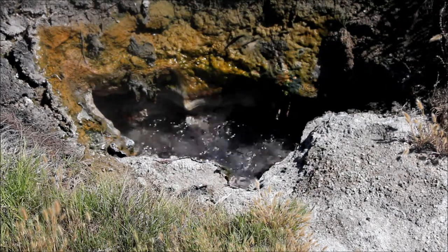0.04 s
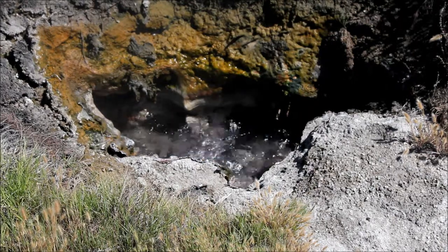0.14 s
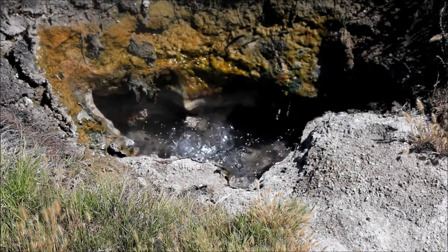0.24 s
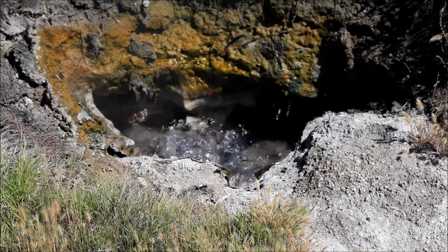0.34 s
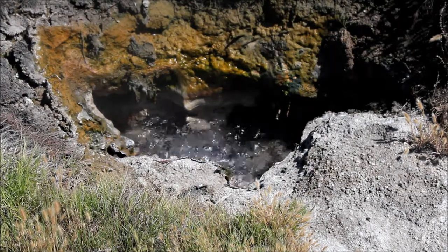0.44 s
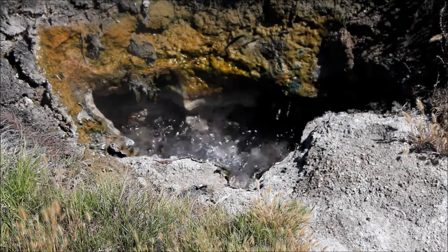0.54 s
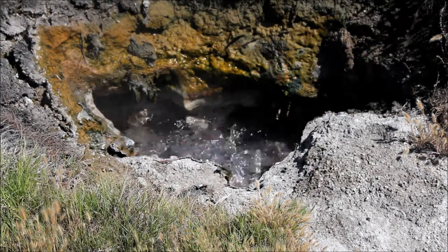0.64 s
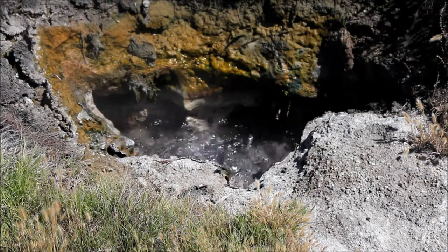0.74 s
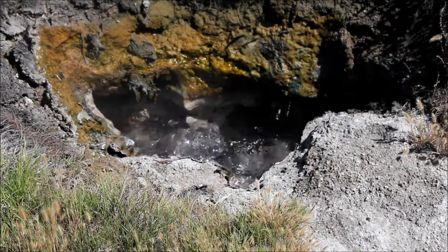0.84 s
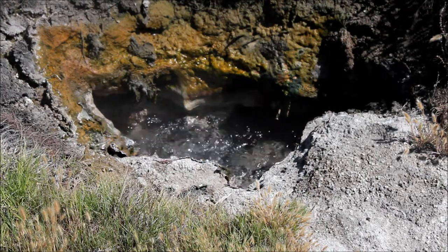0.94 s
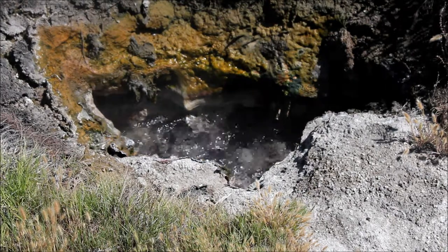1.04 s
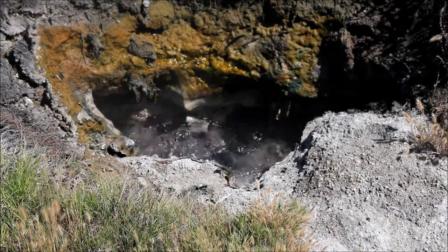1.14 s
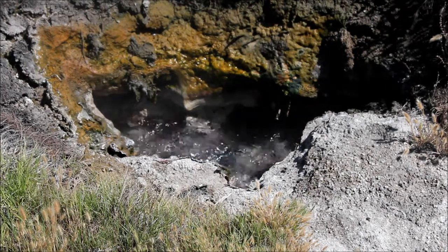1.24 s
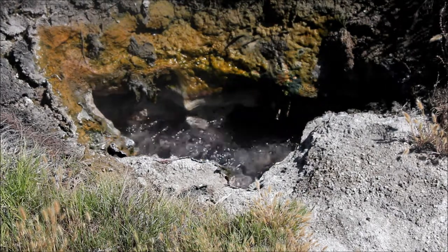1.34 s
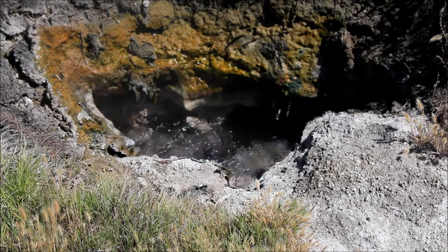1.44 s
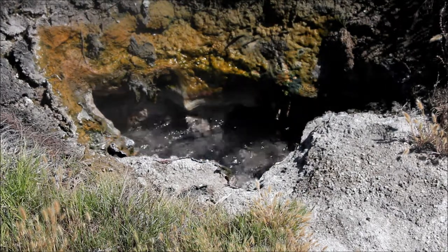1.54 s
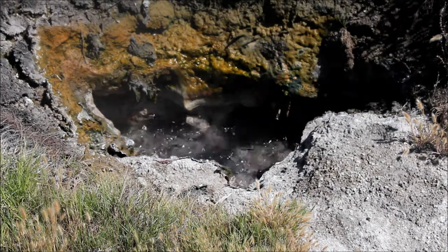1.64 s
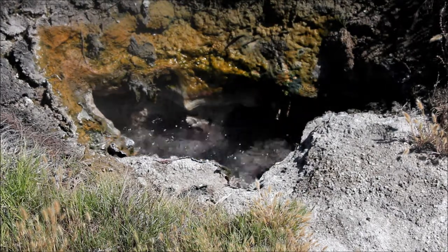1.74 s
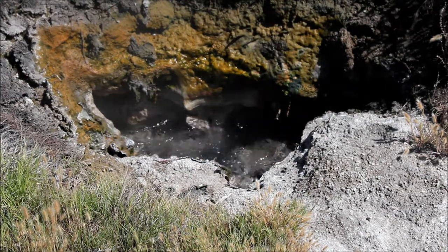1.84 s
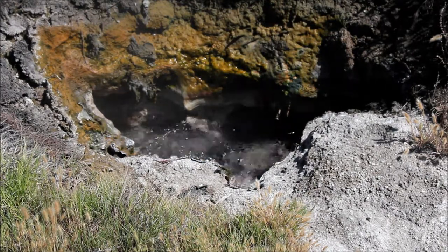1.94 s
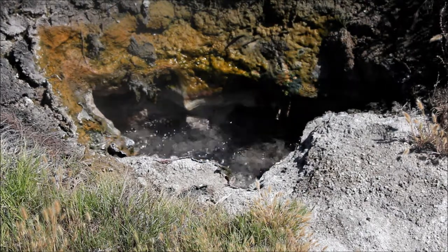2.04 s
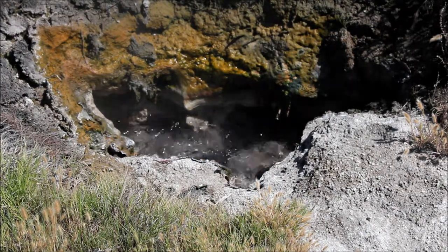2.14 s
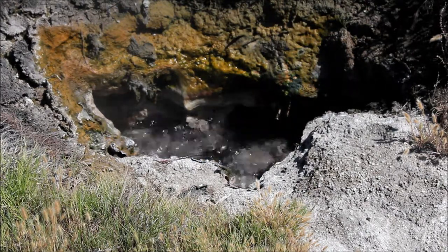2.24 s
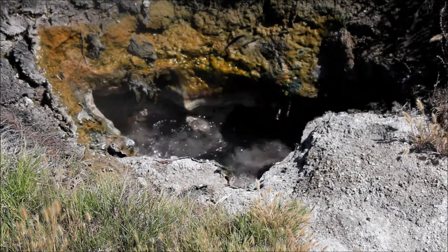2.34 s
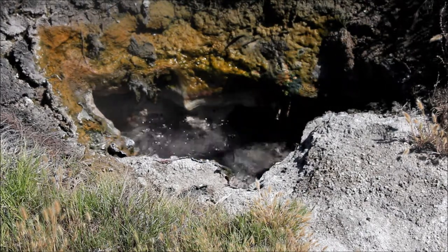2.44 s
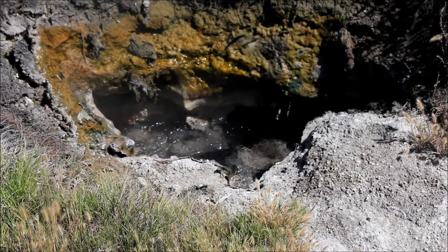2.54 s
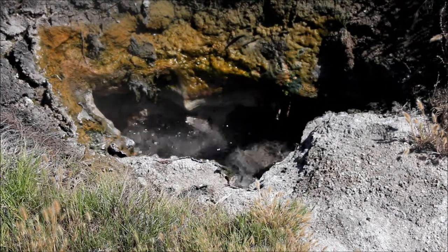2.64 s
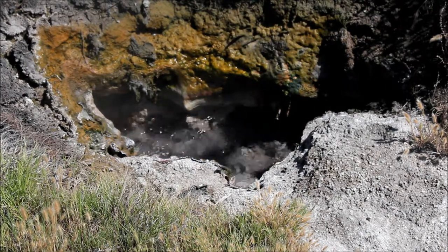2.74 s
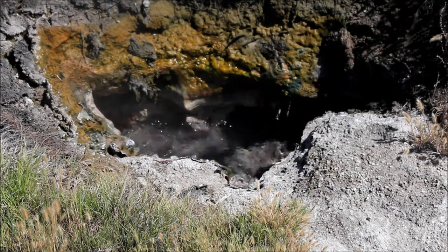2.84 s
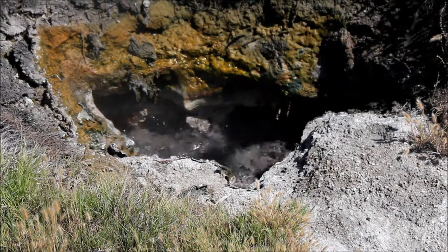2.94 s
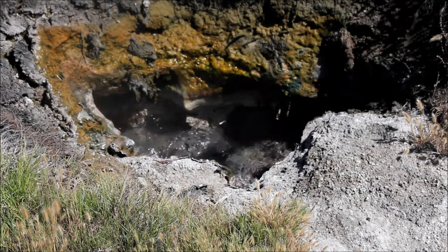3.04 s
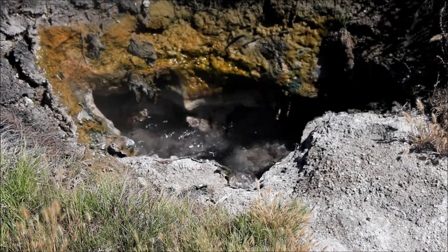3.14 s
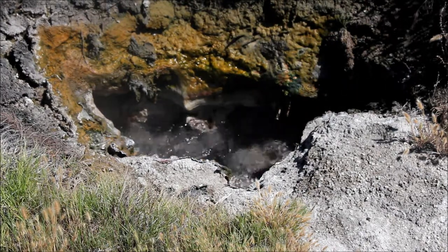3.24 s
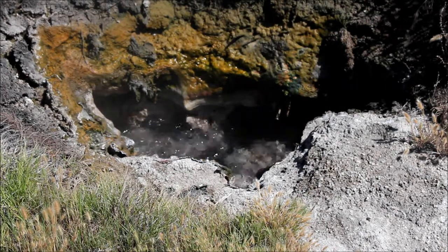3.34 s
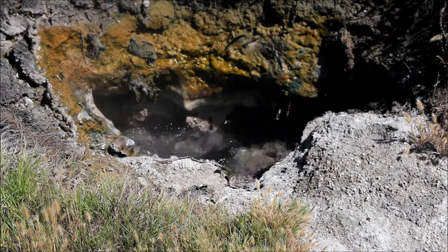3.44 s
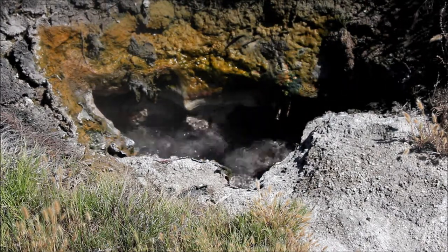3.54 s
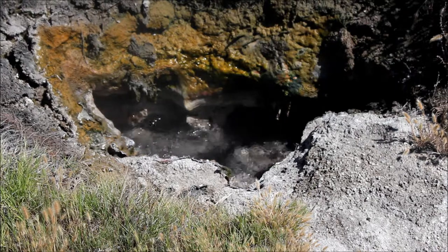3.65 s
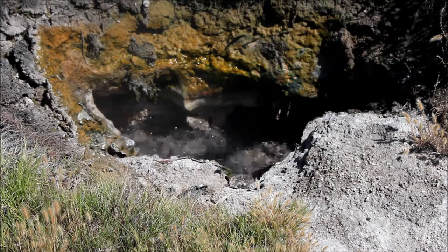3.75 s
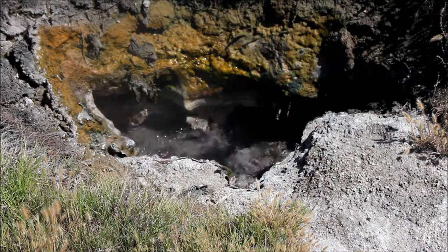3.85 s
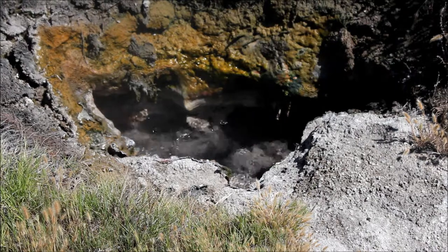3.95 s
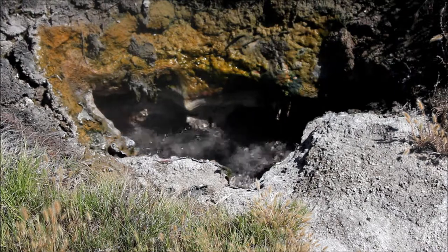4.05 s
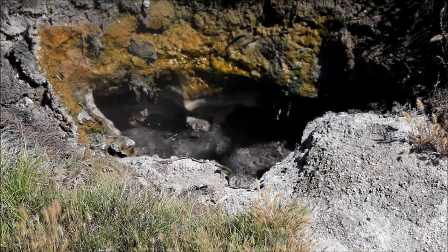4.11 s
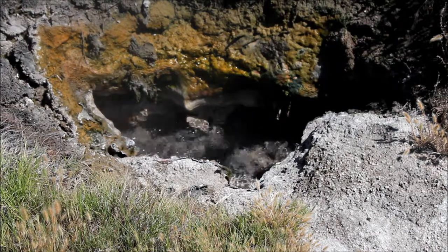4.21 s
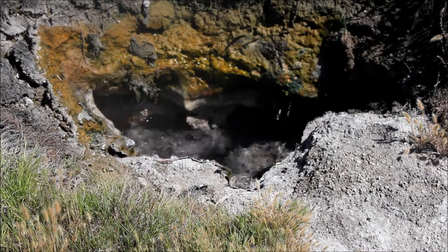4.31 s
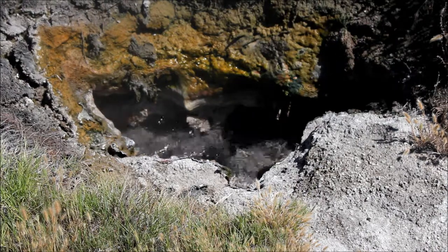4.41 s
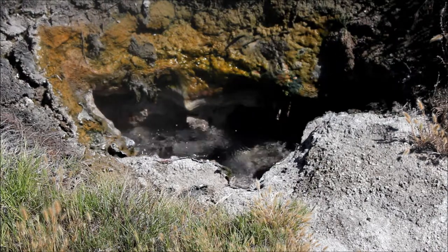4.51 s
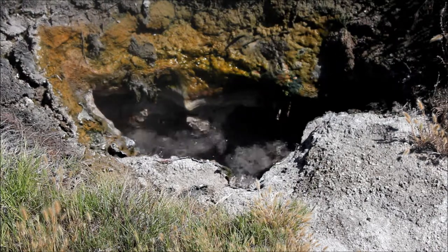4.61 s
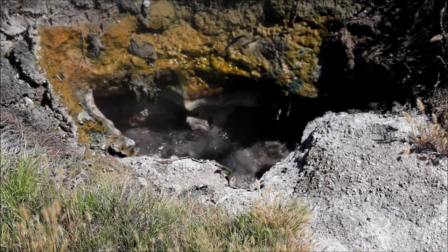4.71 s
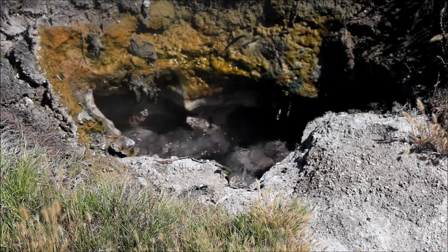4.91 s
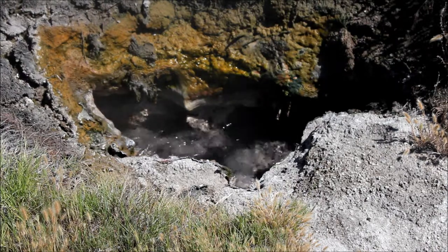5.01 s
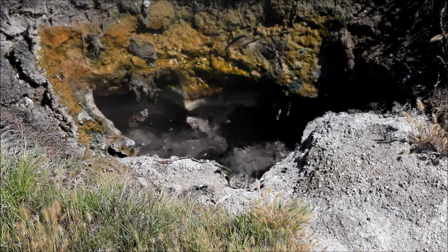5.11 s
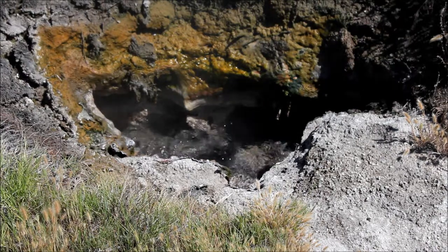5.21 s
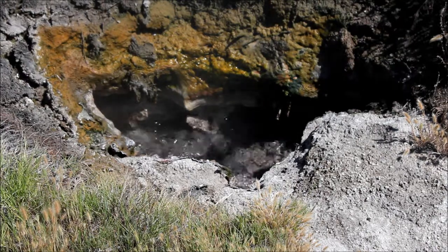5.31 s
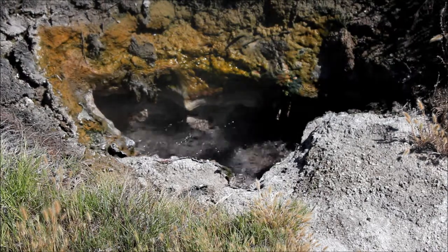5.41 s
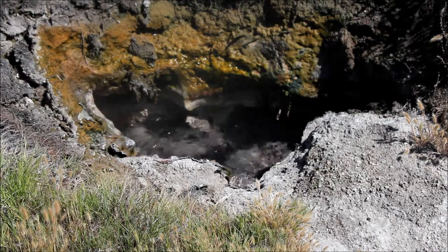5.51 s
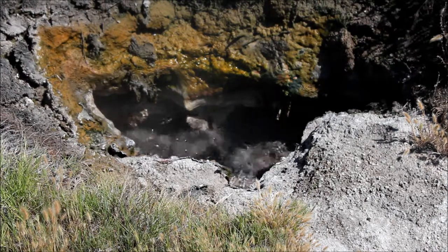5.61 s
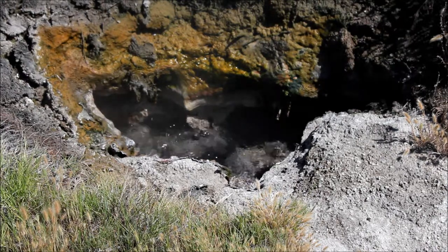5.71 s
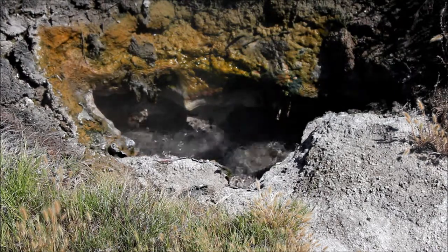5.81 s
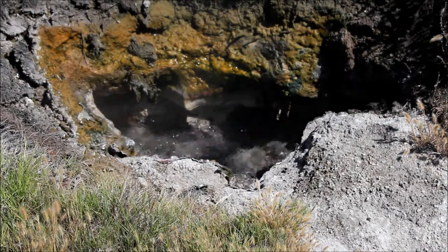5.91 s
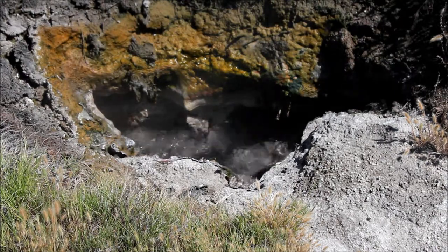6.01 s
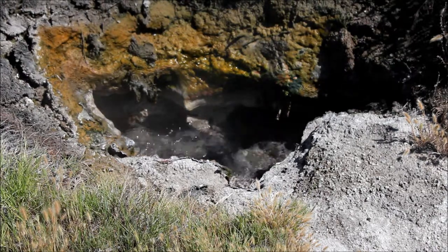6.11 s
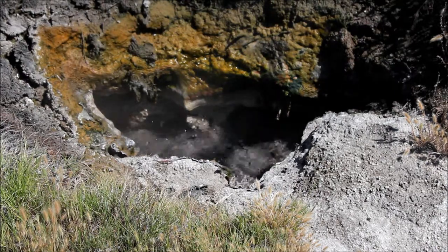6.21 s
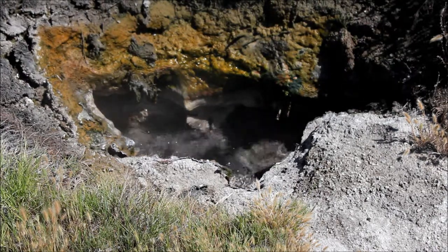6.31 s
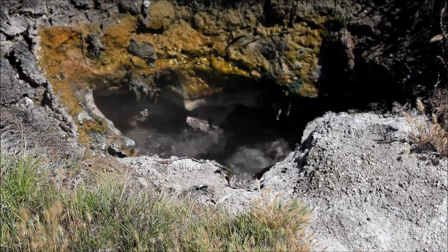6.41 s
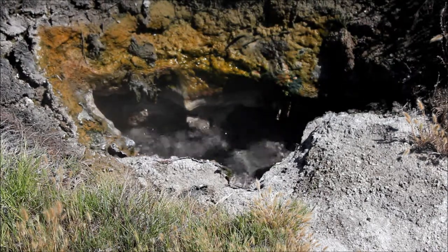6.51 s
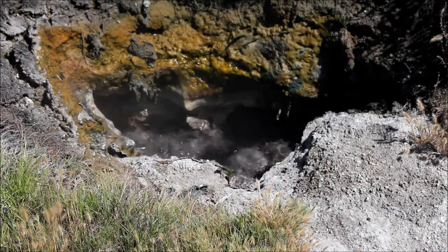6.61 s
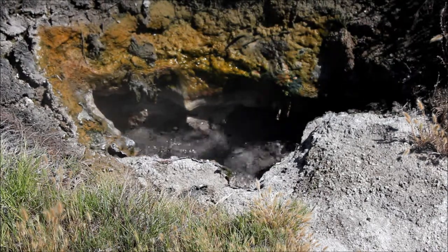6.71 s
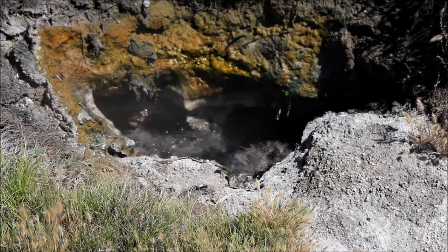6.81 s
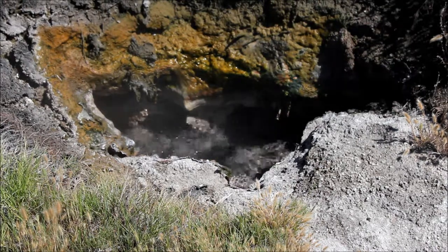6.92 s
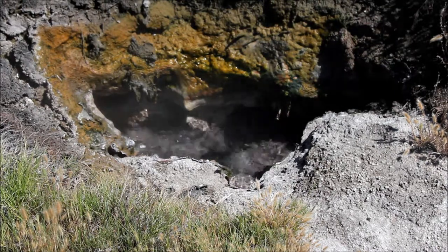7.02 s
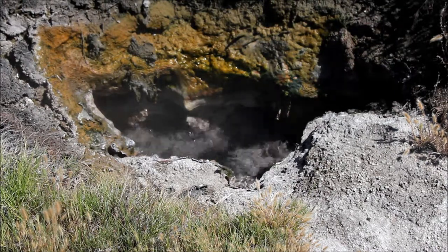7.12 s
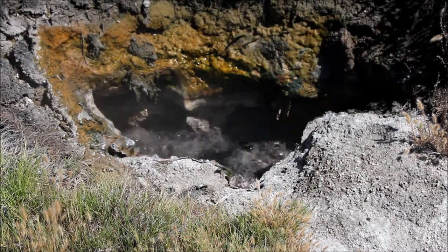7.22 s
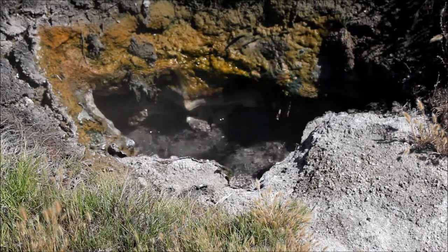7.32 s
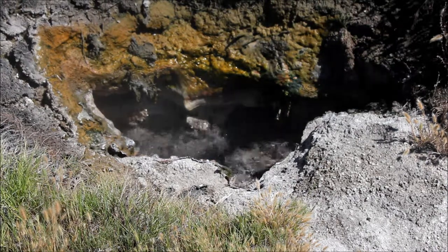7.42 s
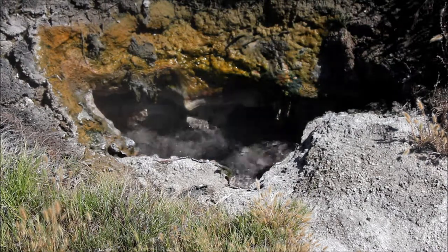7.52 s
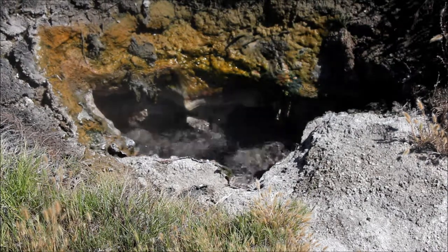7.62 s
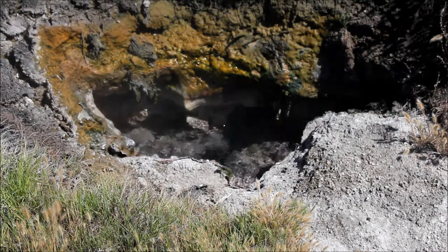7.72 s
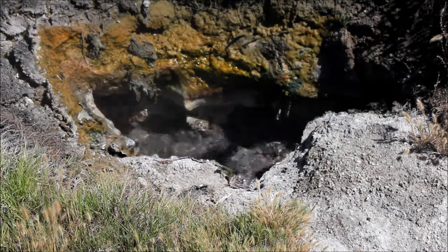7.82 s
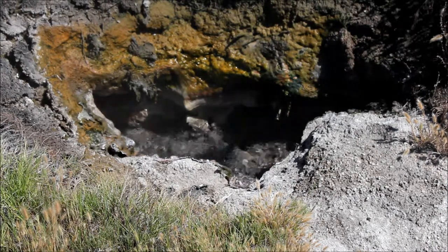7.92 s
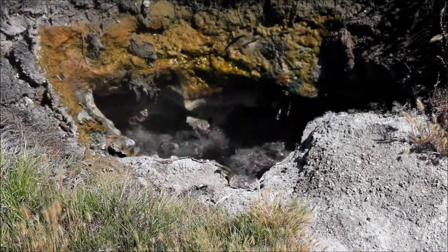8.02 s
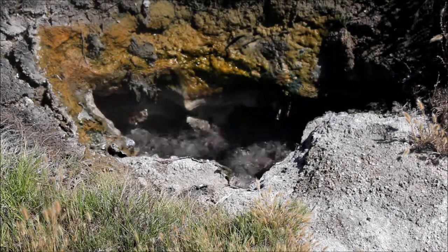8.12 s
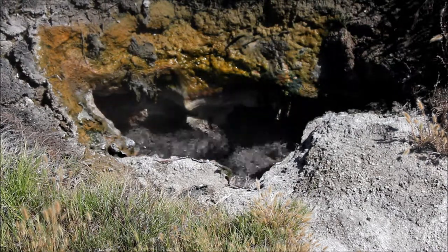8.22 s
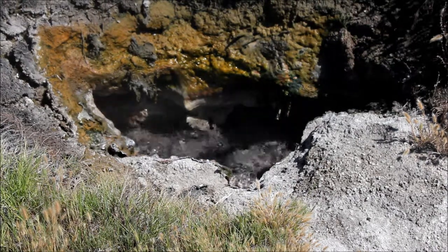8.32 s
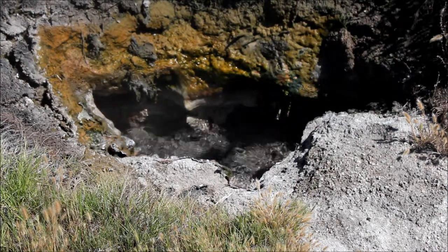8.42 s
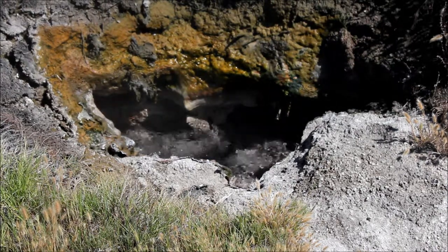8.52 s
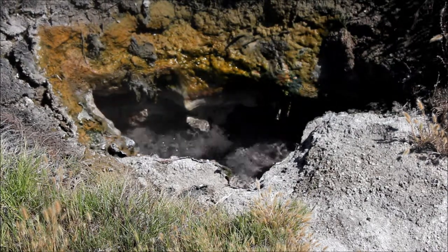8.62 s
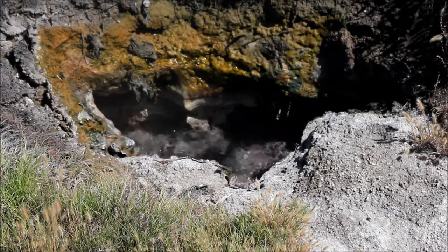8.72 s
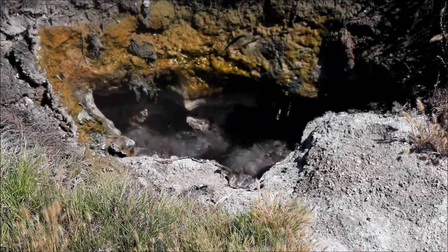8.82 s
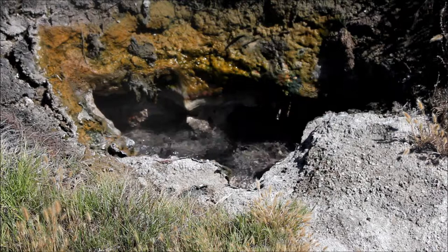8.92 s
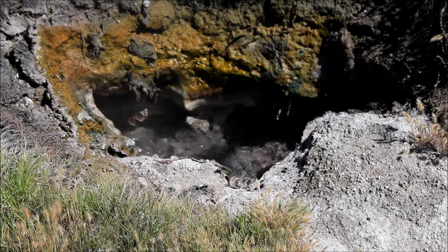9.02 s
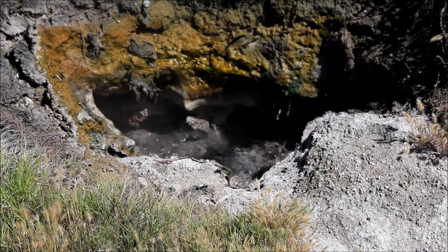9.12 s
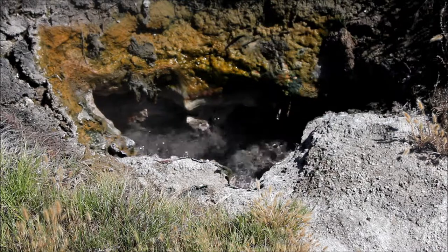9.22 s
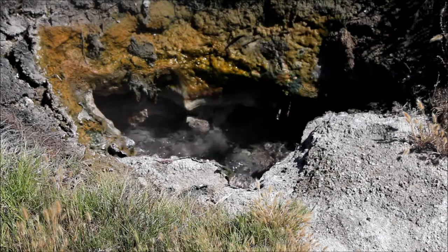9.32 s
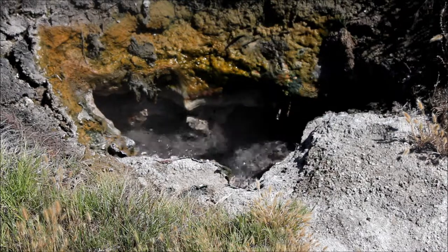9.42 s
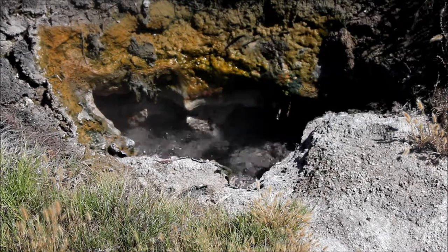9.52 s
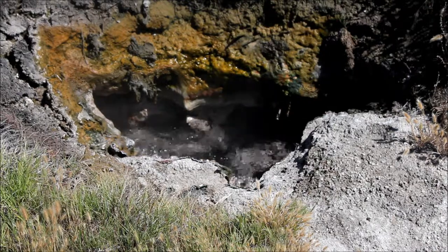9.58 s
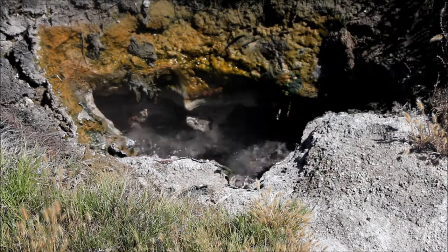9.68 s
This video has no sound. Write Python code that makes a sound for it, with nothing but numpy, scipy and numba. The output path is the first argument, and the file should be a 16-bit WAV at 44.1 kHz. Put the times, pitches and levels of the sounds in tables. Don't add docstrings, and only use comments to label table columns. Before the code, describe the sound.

Outdoors, a small camera microphone a few metres from a rocky hot spring picks up a dense, hollow boil in mono. It opens with a splashy outburst of pops, plinks and spray, settles into uneven gurgling with occasional deep gulps, then grows livelier near the end. A cicada buzzes high and thin throughout, throbbing many times a second.

```python
import sys
import numpy as np
from scipy import signal
from scipy.fft import rfft, irfft, next_fast_len
from scipy.io import wavfile
from scipy.ndimage import uniform_filter1d
from numba import njit

SR = 44100
rng = np.random.default_rng(int(sys.argv[2]) if len(sys.argv) > 2 else 0)


def transcribe(u):
    v = np.clip(np.atleast_2d(u).T, -1, 1)
    q = np.round(v * 32767).astype(np.int16)
    wavfile.write(sys.argv[1], SR, q)


def makeup_ratio(level_db):
    decades = np.asarray(level_db, float) / 20
    return 10 ** decades


N = 429975
T = np.arange(N) / SR

# [t/s, level above calm/dB]
BOIL_VIGOUR = [(0.0, 10), (0.12, 4.5), (0.5, 6.5), (0.62, 7), (0.8, 8.5), (1.0, 2.5), (1.5, 4.5), (2.6, 5),
               (3.6, 2), (4.7, 0), (5.3, 1), (5.9, 1), (7.0, 1), (8.1, 1.5), (8.5, 3.5), (9.0, 2.5),
               (9.75, 5)]
# [f/Hz, level per Hz/dB]
HOLLOW_COLOUR = [(60, -36), (110, -13.5), (221, -5), (297, -7.5), (348, -11), (500, -2), (630, -1.5),
                 (800, -10), (990, -6.5), (1400, -11.5), (2500, -14.5), (2950, -24), (3500, -27),
                 (6000, -27.5), (7800, -54)]
# [t/s, peak level/dB, f/Hz]
GULPS = [(0.172, -43.5, 85.5), (0.302, -36, 105), (0.585, -33, 199), (0.625, -29.5, 207), (0.691, -44, 195),
         (1.047, -45, 280), (1.171, -45, 222), (1.4, -43, 252), (1.449, -36.5, 189), (1.823, -41.5, 198),
         (1.973, -38, 96), (2.139, -37, 142), (2.649, -33, 184), (2.974, -42.5, 200), (3.278, -43, 272),
         (4.747, -26.5, 224), (4.968, -36, 88), (5.022, -37.5, 83.4), (5.118, -36.5, 202), (5.77, -40, 109),
         (5.833, -42, 188), (6.289, -46, 193), (6.652, -36.5, 230), (8.017, -40, 202), (8.556, -39, 180),
         (9.316, -45, 230), (9.394, -38.5, 255), (9.447, -44, 293), (9.603, -39, 200)]
# [t/s, peak level/dB, f/Hz]
GURGLES = [(0.349, -36, 218), (0.419, -39, 94.2), (0.519, -42, 67.3), (1.329, -48, 183), (1.488, -40, 242),
           (1.678, -44, 151), (1.78, -48, 61.9), (2.029, -39, 108), (2.078, -43, 223), (2.836, -52, 99.6),
           (4.003, -48, 202), (4.611, -40, 88.8), (4.709, -45, 202), (5.199, -44, 269), (5.895, -40, 234),
           (6.998, -49, 291), (9.069, -47, 256), (9.249, -48, 191), (9.349, -39, 188), (9.529, -43, 210),
           (9.558, -43, 202), (9.709, -43, 237)]
# [t/s, peak level/dB, f/Hz]
POPS = [(0.036, -29.5, 633), (0.343, -33, 570), (0.447, -32.5, 755), (0.504, -36, 1300), (0.529, -33, 560),
        (0.691, -34, 520), (0.742, -31.5, 776), (0.793, -36, 570), (0.802, -37, 600), (0.838, -37, 900),
        (0.866, -36, 594), (1.111, -40, 1000), (1.549, -38, 546), (1.579, -44, 634), (2.055, -40, 806),
        (2.184, -35, 544), (2.288, -38, 505), (2.488, -36, 550), (2.55, -33.5, 796), (2.617, -33.5, 538),
        (3.562, -40.5, 610), (4.524, -43, 588), (4.936, -31.5, 710), (6.326, -41, 526), (6.68, -20.5, 860),
        (8.109, -40, 474), (8.245, -43, 490), (8.453, -35, 544), (8.527, -35, 746), (9.076, -36.5, 640),
        (9.15, -33, 740), (9.3425, -31, 874)]
# [t/s, peak level/dB, f/Hz]
BLIPS = [(0.1511, -37, 1060), (0.2173, -33, 1750), (0.2952, -43, 1180), (0.4489, -40, 1100),
         (0.5044, -31, 1200), (0.7424, -38, 974), (0.7826, -28, 920), (0.8255, -34, 2170),
         (0.924, -29, 1210), (0.9931, -35, 1200), (1.025, -34, 2450), (1.1184, -43, 2500),
         (1.119, -30, 1170), (1.7719, -33, 1080), (2.0971, -39, 1760), (3.3817, -38, 977),
         (3.454, -40, 1030), (4.1719, -38, 1020), (4.2633, -33, 1060), (4.3989, -38, 1487),
         (5.88, -41, 990), (6.6049, -39, 1280), (6.6812, -32, 902), (7.196, -35, 1690), (7.3003, -37, 1030),
         (7.433, -33, 1160), (7.4924, -40, 1180), (7.661, -33, 1180), (7.7438, -35, 1060),
         (7.7782, -36, 972), (8.309, -34, 1076), (8.3439, -35, 1070), (8.536, -30, 1210),
         (8.5639, -35, 1880), (8.6088, -35, 1040), (8.736, -41, 1040), (8.8278, -43, 1050),
         (9.2344, -37, 1020), (9.3442, -35.5, 927), (9.6315, -39, 1070)]
# [t/s, peak level/dB, f/Hz]
PLINKS = [(0.0174, -32, 5600), (0.1121, -37.5, 4560), (0.2179, -41, 5880), (0.2952, -51, 3140),
          (0.3346, -47, 4360), (0.3501, -47, 2670), (0.404, -45, 2600), (0.41, -42, 2810),
          (0.4105, -36, 4630), (0.4875, -41, 2820), (0.5611, -43, 3060), (0.6125, -40, 2600),
          (0.6749, -40, 4170), (0.7133, -45, 3370), (0.7537, -41, 3200), (0.758, -34, 4460),
          (0.7841, -26.5, 3150), (0.9043, -41, 2680), (0.924, -38, 3240), (0.9497, -43, 3240),
          (0.9933, -36, 3080), (1.027, -34, 3000), (1.117, -24.5, 3140), (1.2735, -49, 3160),
          (1.3174, -46, 3220), (1.374, -41, 3020), (1.4117, -50, 2990), (1.4177, -45, 2620),
          (1.4393, -43, 2680), (1.476, -39, 5730), (1.6008, -43, 3090), (1.633, -42, 2710),
          (2.119, -43, 2620), (2.151, -43, 2640), (2.4578, -42, 2650), (2.5388, -46, 2730),
          (2.837, -36.5, 3810), (3.4994, -54, 2940), (3.8701, -48, 2720), (4.3735, -45, 2730),
          (4.852, -38, 4910), (4.9357, -36, 2900), (5.293, -43, 4310), (5.3792, -42, 2660),
          (5.4904, -48, 2680), (5.9289, -51, 2650), (6, -47, 2950), (6.0586, -46, 3400),
          (6.6807, -44, 2640), (7.1087, -44, 2830), (8.4073, -43, 5750), (8.4128, -45, 3150),
          (8.4831, -44, 2690), (8.4976, -42, 2860), (8.526, -40, 3860), (8.5639, -43, 5030),
          (8.6083, -39, 3770), (9.3794, -44, 2640)]
# [t/s, peak level/dB, f/Hz]
SNAPS = [(0.0149, -27, 10800), (0.2179, -35, 11000), (0.41, -32, 11600), (0.45, -32, 12700),
         (0.4798, -47, 11700), (0.4798, -30, 14100), (0.4993, -23, 12500), (0.5751, -39, 9850),
         (0.5901, -37, 12000), (0.6444, -44, 9860), (0.7512, -52, 9600), (0.7512, -36, 10400),
         (0.7906, -33, 10400), (0.7906, -28, 14000), (0.815, -31, 13500), (0.835, -40, 14500),
         (0.9038, -45, 14300), (0.9038, -39, 12200), (0.9487, -41, 12600), (1.1159, -38, 12200),
         (1.2735, -39, 11800), (1.4097, -36, 13400), (1.6462, -37, 10700), (2.1949, -42, 12800),
         (2.2119, -35, 11600), (2.5346, -40, 11800), (2.5591, -43, 14900), (2.7706, -44, 13000),
         (3.1737, -45, 12200), (3.5556, -33, 11700), (3.8447, -45, 14000), (3.9659, -44, 12260),
         (4.2896, -40, 13100), (4.3545, -44, 14300), (4.3829, -46, 9500), (4.3829, -30, 13200),
         (4.4039, -37, 10900), (4.8349, -46, 11100), (4.8514, -44, 14800), (4.8514, -35, 10000),
         (4.8768, -43, 13800), (5.464, -41, 13100), (5.5583, -37, 15200), (5.7803, -44, 10500),
         (6.0087, -40, 9500), (6.0087, -38, 14100), (6.1624, -45, 11400), (6.4742, -36, 13500),
         (6.7211, -47, 13200), (6.7436, -44, 12800), (7.0005, -46, 10100), (7.0494, -48, 10300),
         (8.0331, -46, 10600), (8.3439, -43, 9960), (8.4128, -44, 10300), (8.4836, -45, 12400),
         (8.5031, -40, 14700), (8.526, -38, 14000), (8.5629, -41, 11800), (8.6083, -45, 9790)]
# [delay/ms, level/dB]
ROCK_ECHOES = [
    (4.4, -14.5),
    (7.5, -17.5),
    (13.0, -35),
    (21.0, -31),
]
# [middle t/s, peak level/dB, half length/s]
HEAVES = [(0.313, -46, 0.088), (0.554, -46, 0.11), (0.89, -57, 0.046), (1.76, -47.5, 0.067),
          (2, -47, 0.054), (2.135, -47, .04), (2.65, -47.5, 0.061), (2.87, -53, 0.044), (3.548, -52, 0.094),
          (3.904, -58, .06), (4.297, -54, 0.045), (4.63, -46, 0.017), (5.054, -47, .03), (5.55, -59, .04),
          (5.766, -44, 0.044), (5.948, -57, 0.027), (7.33, -68, .06), (7.586, -56, 0.04),
          (8.439, -59, 0.027), (8.606, -39, 0.039), (8.788, -56, 0.05), (9.15, -72, .12),
          (9.604, -53, 0.042)]
# [f/Hz, level per Hz/dB]
SURGE_COLOUR = [(13, -48), (22, -4.5), (54, 2), (107, 0), (136, -2.5), (160, -5.5), (210, -13), (350, -120)]
# [t/s, peak level/dB, rise/ms, wet body level/dB]
DROPS_ON_STONE = [(0.0134, -29.5, 2.8, -18), (0.2179, -34, 2, -26), (0.41, -38, 2.7, -4),
                  (0.4494, -43, 2.2, -15), (0.4798, -36, 1.6, -18), (0.4993, -33.5, 2.5, -12),
                  (0.753, -38, 2.1, -2), (0.7866, -32, 3.1, 7), (0.814, -34, 2.5, 0), (0.948, -42, 2.5, 8),
                  (1.112, -32.5, 3.4, 1), (1.4097, -42, 2.7, 0), (1.6462, -44, 2.1, -14),
                  (3.5553, -46, 2, -18), (4.2896, -50, 1.6, -13), (4.382, -33.5, 2.2, -10),
                  (4.4039, -44, 2.5, -13), (4.8349, -54, 2.5, -4), (4.85, -37, 1.8, -13),
                  (5.465, -45, 1.5, -8), (5.5583, -57, 2.5, -15), (6.0087, -36, 5.3, -5),
                  (6.474, -57, 2.1, -15), (6.7436, -46, 2.3, -1), (8.3439, -41, 2.2, -3),
                  (8.4118, -41, 2.5, -10), (8.5031, -37, 3.3, -15), (8.524, -34, 1.5, -8),
                  (8.5629, -36, 1.6, -5), (8.608, -35.5, 0.76, 1)]
# [f/Hz, level per Hz/dB]
SPRAY_COLOUR = [(1500, 5), (3000, -4.5), (6000, -4.5), (10000, -6.5), (15500, -6.5)]
# [f/Hz, level per Hz/dB]
SPLASH_COLOUR = [(400, 5), (900, -5), (3200, -13), (5500, -17), (7000, -19)]
# [t/s, throb lead/cycles, level/dB, body f/Hz]
CICADA_SONG = [(0.0, 0.38, -49.5, 7670), (0.55, 0.33, -54.5, 7620), (1.0, 0.18, -50, 7690),
               (1.5, 0.17, -52, 7660), (2.3, -0.079, -48.5, 7680), (3.0, 0.19, -51, 7675),
               (3.75, 0.19, -54, 7680), (4.5, 0.086, -51, 7660), (5.08, .1, -52.5, 7800),
               (5.45, 0.11, -50, 7690), (5.75, 0.0021, -55, 7670), (6.1, 0.1, -48, 7660),
               (6.47, .03, -53, 7550), (6.8, 0.011, -53, 7730), (7.5, 0.0094, -50, 7714),
               (8.3, -0.082, -54, 7755), (8.65, -0.04, -51, 7740), (9.1, 0.16, -55, 7730)]
# [middle t/s, depth lost 0-1, half length/s]
FALTERS = [
    (.42, 0.6, 0.14),
    (2.5, 0.4, 0.17),
    (8.35, 0.5, 0.46),
    (9.3, 0.6, 0.12),
    (9.6, 0.7, 0.17),
]
# [t/s, f/Hz, level/dB]
BIRD_PEEP = [
    (6.04, 3470, -80),
    (6.056, 3450, -65),
    (6.096, 3320, -69),
    (6.165, 3280, -71),
    (6.18, 3275, -80),
]

CHURN_DB, CHURN_SHARE = -47, 0.24
SURGE_DB, SURGE_SHARE = -60.5, 0.93
SPRAY_DB, SPRAY_SHARE = -66, 1
CRACKLE_DB, CRACKLE_SHARE = -68, 1
SHOWER_DB, SHOWER_S = -24, 0.021
THROB_HZ, CLICK_HZ = 14.5, 393.4
THROB_DEPTH = 0.75
THROB_SCATTER_DB, RATE_SCATTER = 1.5, .0012
SLIP, SLIP_SCATTER = -.04, .05
SAG = .036


def churn(db, count=12000, scatter_db=1.5, hiss_db=3.5):
    when, pitch, size, long = rng.random((count, 4)).T
    hz = 120 * 40 ** pitch
    strength = hz * makeup_ratio(-scatter_db * np.log(1 - .97 * size))
    swarm = bubbles(when * N / SR, hz, strength, 2.18 + 2.3 * long, 0.041, 1.38)
    wash = rng.standard_normal(N) * makeup_ratio(0.5 * walk(12))
    flat = swarm / np.std(colour(swarm, HOLLOW_COLOUR))
    flat = flat + makeup_ratio(hiss_db) * wash / np.std(colour(wash, HOLLOW_COLOUR))
    return level(colour(flat, HOLLOW_COLOUR), 0) * makeup_ratio(db + 0.16)


def bursts():
    out = 0
    for table, cycles, glide, fall, trim_db in ((GULPS, 1.8, -.03, 2.2, 1.5),
                                                (POPS, 1.9, -.04, 2.2, -.3),
                                                (PLINKS, .8, .003, .09, .3),
                                                (SNAPS, 3.0, -.03, 4.5, 1.2),
                                                (BLIPS, 1.6, .02, 1.2, -4.0),
                                                (GURGLES, 2.2, -.03, 1.8, -3.0)):
        s, db, hz = np.transpose(table)
        out = out + bubbles(s, hz, makeup_ratio(db + trim_db), cycles + 0 * s, glide, fall)
    out = out + gulp_companions() + plink_sisters()
    return out + sum(makeup_ratio(db) * np.roll(out, int(ms * SR / 1000)) for ms, db in ROCK_ECHOES)


def gulp_companions():
    s, db, hz = np.transpose(GULPS)
    out = bubbles(s + 0.72 / hz, 1.56 * hz, makeup_ratio(db - 8.0), 1.73 + 0 * s, .02, 1.5)
    apart, size = rng.random((len(s), 2)).T
    for side in (-1, 1):
        when = np.abs(s + side * (0.0299 + 0.0406 * apart))
        pitch = hz * (1 + side * (.5 * size - .2))
        out += bubbles(when, pitch, makeup_ratio(db - 10.5), 1.84 + 0 * s, 0.035, 3.6)
    return out


def plink_sisters():
    s, db, hz = np.transpose(PLINKS)
    late, size = rng.random((len(s), 2)).T
    out = 0
    for ratio, sister_db in ((.45, -17), (1.3, -6)):
        pitch = hz * ratio * (0.875 + 0.28 * size)
        out = out + bubbles(s + .004 * late, pitch, makeup_ratio(db + sister_db), 2.3 + 0 * s, 0.066, 1.0)
    return out


def surge(db):
    lumps = rng.standard_normal(N) * makeup_ratio(0.44 * walk(9.7))
    low = colour(lumps, list(SURGE_COLOUR) + [(400, -42)])
    return level(low, 0) * np.hypot(makeup_ratio(db - 4.5), makeup_ratio(-70))


def spray(db, count=4000, scatter_db=2.0):
    when, size, pitch = rng.random((count, 3)).T
    size = makeup_ratio(-scatter_db * np.log(1 - .99 * size))
    fizz = bubbles(when * N / SR, 9300 * 1.65 ** pitch, size, 3.3 + 0 * when, 0., 3.0)
    mist = makeup_ratio(db + 11.5 + 2.54 * walk(70))
    body = np.zeros(N)
    for s, peak_db, ms, body_db in DROPS_ON_STONE:
        start = int(s * SR)
        age = np.arange(min(2000, N - start)) / SR * 1000 / max(ms, .3)
        puff = makeup_ratio(peak_db - 2.5) * np.exp(-1.6 * (age - 1.3) ** 2 / (1 + .3 * age))
        mist[start:start + len(age)] += puff
        body[start:start + len(age)] += puff * makeup_ratio(body_db + 9.5)
    wet = colour(rng.standard_normal(N) * mist, SPRAY_COLOUR)
    wet = wet + colour(rng.standard_normal(N) * body, SPLASH_COLOUR)
    return wet + level(fizz, -1.5) * makeup_ratio(db + 3.5 * walk(45))


def crackle(db, count=4000, scatter_db=3.0):
    when, size, pitch = rng.random((count, 3)).T
    size = makeup_ratio(-scatter_db * np.log(1 - .99 * size))
    drops = bubbles(when * N / SR, 1500 * 5.0 ** pitch, size, 2.0 + 0 * when, .03, 2.1)
    showers = swells((s, makeup_ratio(peak_db + SHOWER_DB + body_db / 3.), SHOWER_S)
                     for s, peak_db, _, body_db in DROPS_ON_STONE)
    return level(drops, 0) * (makeup_ratio(db) + showers) * makeup_ratio(2.0 * walk(25))


def cicada():
    s, *columns = np.transpose(CICADA_SONG)
    lead, db, body_hz = (np.interp(T, s, c) for c in columns)
    depth = THROB_DEPTH * (1 - swells(FALTERS))
    turns = THROB_HZ * T + lead - .22
    beat = turns % 1
    slip, pace, force = rng.standard_normal((300, 3))[turns.astype(int)].T
    pause_slip = (SLIP + SLIP_SCATTER * slip) * (beat < .3) / .3
    pace = 1 + RATE_SCATTER * pace + pause_slip * THROB_HZ / CLICK_HZ
    pace = uniform_filter1d(pace - SAG * beat ** 6, size=200)
    swell = np.clip((beat - .38) / 0.4, 0, 1) * (1 - 0.1 * beat ** 6)
    swell = uniform_filter1d(swell, size=40)
    share = np.clip(.95 * depth, 0, .9)
    near = level(clicks(CLICK_HZ * pace, 0.011, 1.1), 0)
    near = near * (1 - share + 1.18 * share * swell * makeup_ratio(THROB_SCATTER_DB * force))
    near = near * makeup_ratio(1.0 * walk(40))
    far = level(clicks(CLICK_HZ * .985 + 0 * T, .15, 4.0), -12)
    far = far + level(rng.standard_normal(N), -7.5)
    body_hz = body_hz + 1.9 * (body_hz - body_hz.mean())
    body = ring(ring(near, body_hz - 250, 2200.0), body_hz + 200, 1080.0)
    body = body + makeup_ratio(-1.0) * ring(ring(far, body_hz - 200, 1800.0), body_hz + 400, 1700.0)
    back = body_hz[::-1].copy()
    body = ring(ring(body[::-1].copy(), back, 4300.0), back, 4300.0)[::-1]
    return level(body, 0) * makeup_ratio(db + 1.5)


def clicks(hz, jitter, scatter_db):
    phase = np.cumsum(hz / SR) + jitter * walk(150)
    at = np.flatnonzero(np.diff(np.floor(phase)) > 0)
    late = np.clip((phase[at + 1] % 1) * SR / hz[at], 0, 1)
    size = makeup_ratio(scatter_db * rng.standard_normal(N // 50)[:len(at)])
    out = np.zeros(N + 1)
    out[at], out[at + 1] = size * late, size * (1 - late)
    return out[:N]


def bird():
    s, hz, db = np.transpose(BIRD_PEEP)
    loudness = makeup_ratio(np.interp(T, s, db + 4.0, left=-120, right=-120))
    return loudness * np.sin(2 * np.pi * np.cumsum(np.interp(T, s, hz)) / SR)


@njit
def bubbles(s, hz, size, cycles, glide, fall):
    out = np.zeros(N)
    for j in range(len(s)):
        start, rise, phase = int(s[j] * SR), cycles[j] * SR / hz[j], 0.
        for i in range(min(int(rise * (1 + 8 / fall)), N - start)):
            u = i / rise
            swell = np.sin(np.pi / 2 * u) ** 2 if u < 1 else np.exp(-fall * (u - 1) ** 1.5)
            phase += 2 * np.pi * hz[j] * (1 + glide * (u - 1)) / SR
            out[start + i] += size[j] * swell * np.sin(phase)
    return out


@njit
def ring(x, hz, width):
    y, band, low = np.empty(len(x)), 0., 0.
    for i in range(len(x)):
        g, k = np.tan(np.pi * hz[i] / SR), width / hz[i]
        v = (band + g * (x[i] - low)) / (1 + g * (g + k))
        band = 2 * v - band
        low = low + 2 * g * v
        y[i] = k * v
    return y


def level(x, db):
    return x * makeup_ratio(db) / np.sqrt(np.mean(x ** 2))


def colour(x, points):
    hz, db = np.transpose(points)
    size = next_fast_len(N)
    f = np.log(np.arange(size // 2 + 1) * SR / size + 1)
    gain = makeup_ratio(np.interp(f, np.log(hz), db, left=-60, right=db[-1]))
    return irfft(rfft(x, size) * gain, size)[:N]


def walk(rate):
    k = int(SR / rate)
    steps = np.repeat(rng.standard_normal(N // k + 1), k)
    return uniform_filter1d(uniform_filter1d(steps, k), k)[:N]


def swells(table):
    return sum(high * np.exp(-((T - s) / half) ** 2) for s, high, half in table)


def scene():
    vigour = np.interp(T, *np.transpose(BOIL_VIGOUR))
    throb = walk(16)
    heave = swells((s, makeup_ratio(db), half) for s, db, half in HEAVES)
    heave = heave + makeup_ratio(SURGE_DB + SURGE_SHARE * vigour)
    pool = churn(CHURN_DB + CHURN_SHARE * vigour + 0.78 * throb) + bursts()
    pool = pool + surge(20 * np.log10(heave) + 3.3 * throb)
    droplets = spray(SPRAY_DB + SPRAY_SHARE * vigour) + crackle(CRACKLE_DB + CRACKLE_SHARE * vigour)
    return (pool + droplets + cicada() + bird())[None]


def roll_off(x):
    return signal.sosfilt(signal.butter(12, 15880, fs=SR, output="sos"), x)


def record(dry):
    top = signal.ellip(10, .2, 80, 15750, fs=SR, output="sos")
    mix = signal.sosfilt(top, dry)
    return roll_off(mix)


dry = scene()
out = record(dry)
transcribe(out)
```